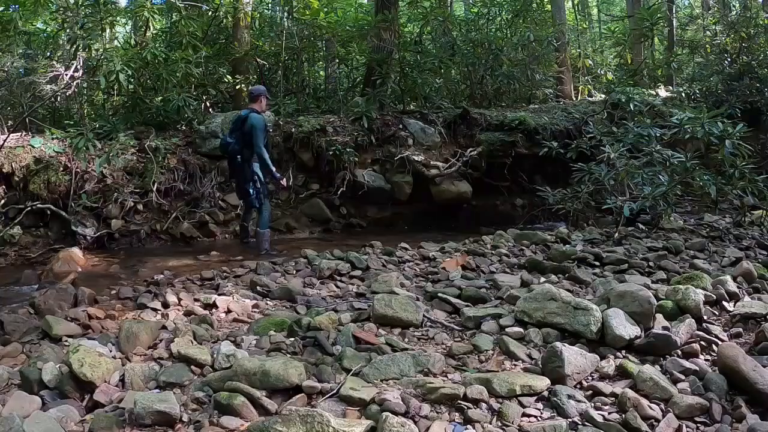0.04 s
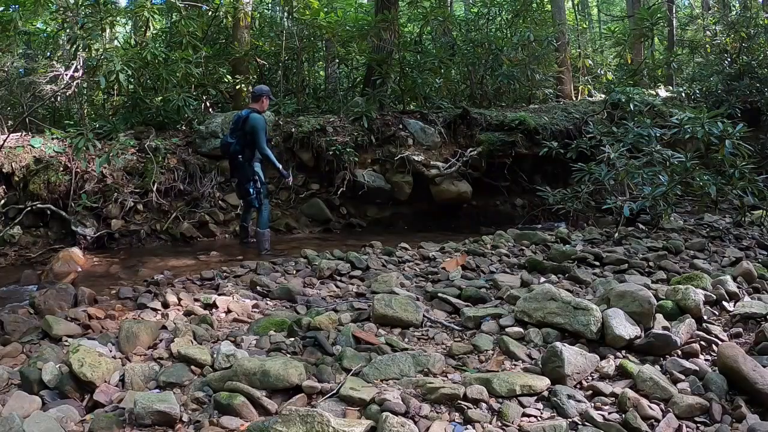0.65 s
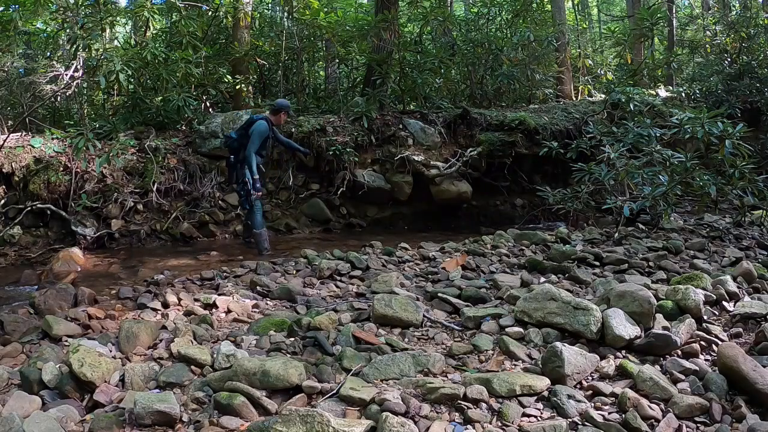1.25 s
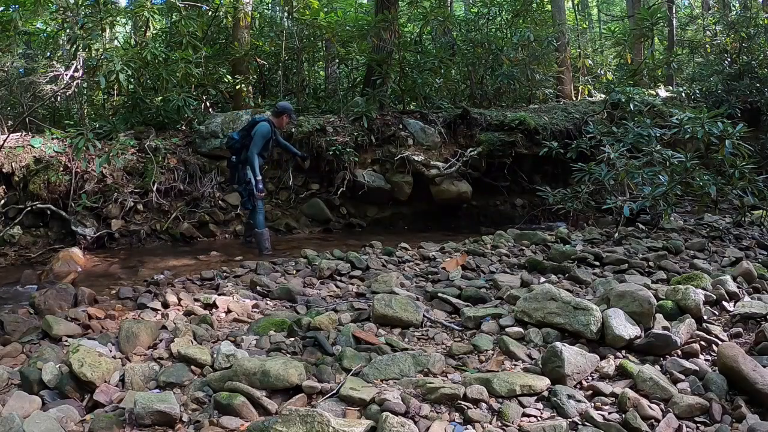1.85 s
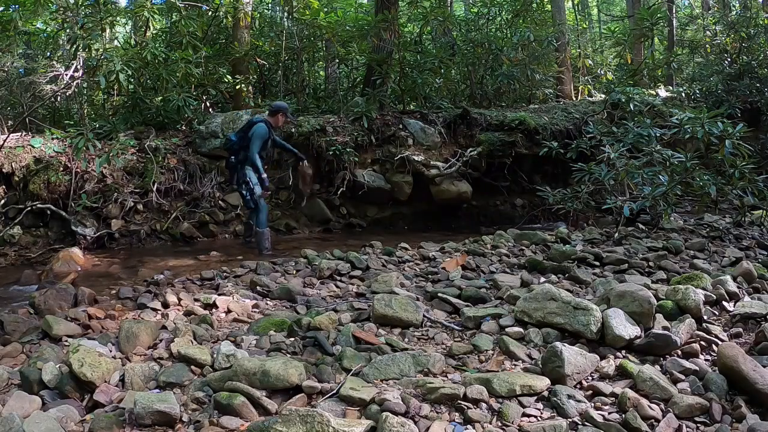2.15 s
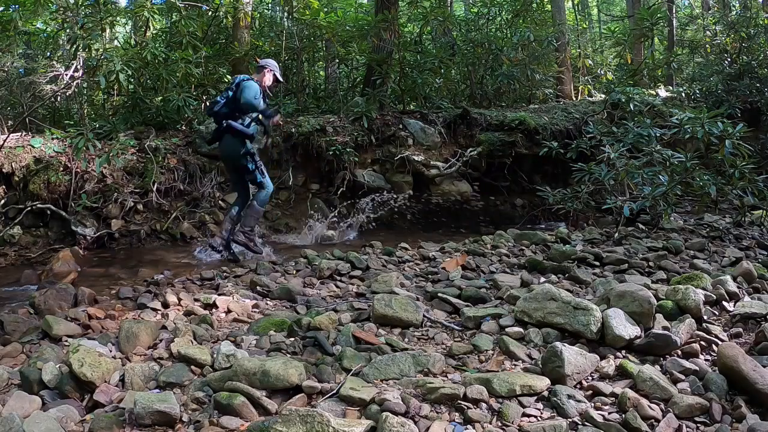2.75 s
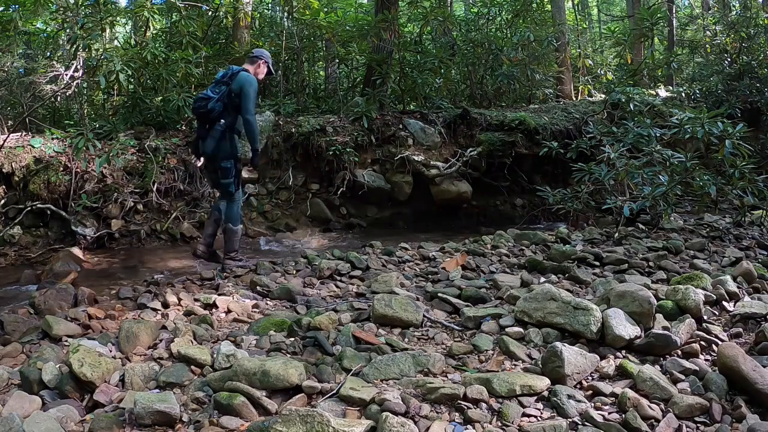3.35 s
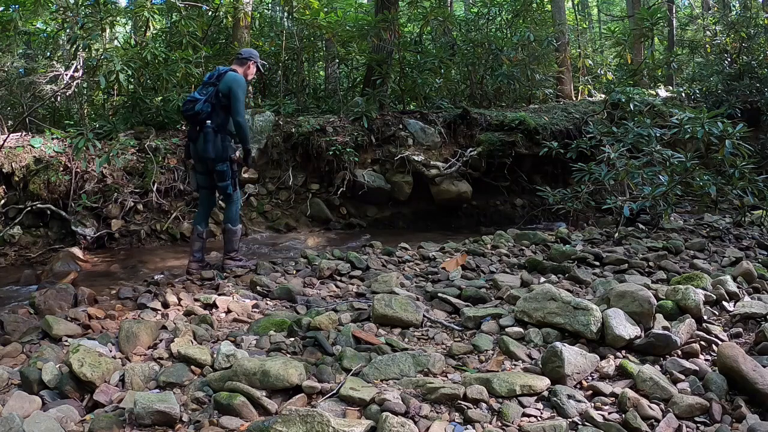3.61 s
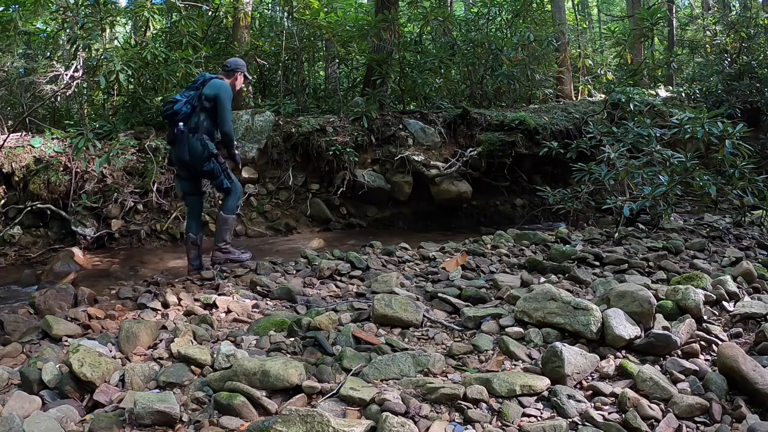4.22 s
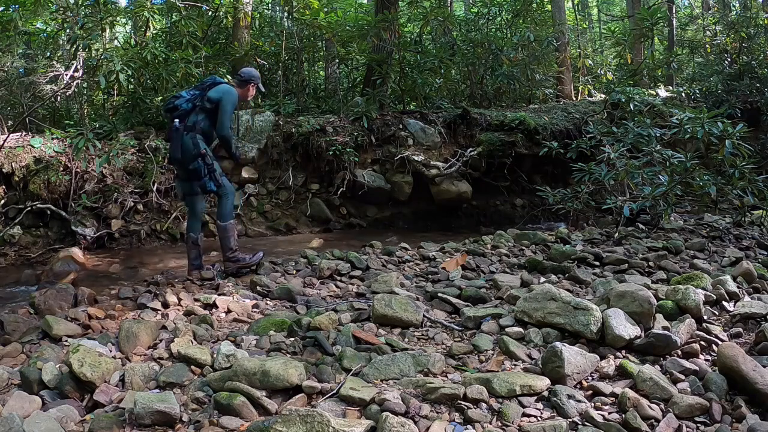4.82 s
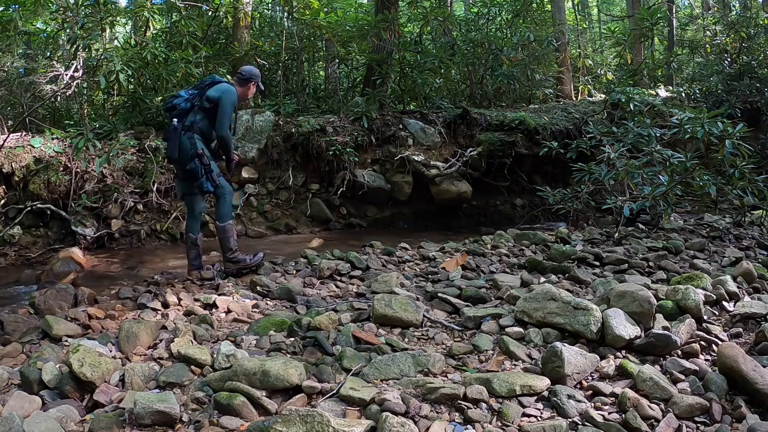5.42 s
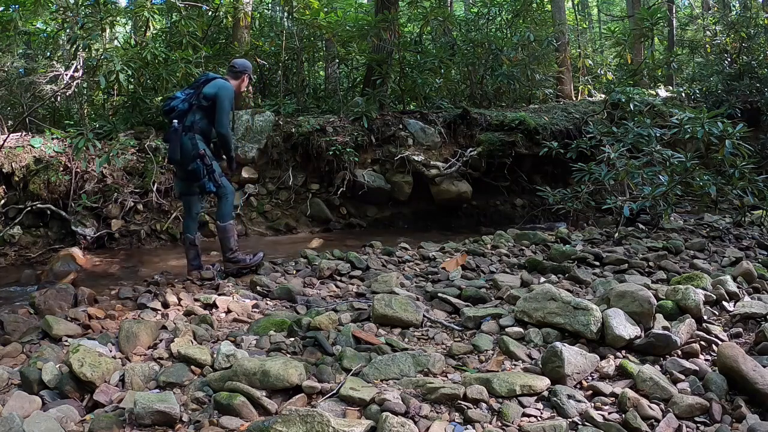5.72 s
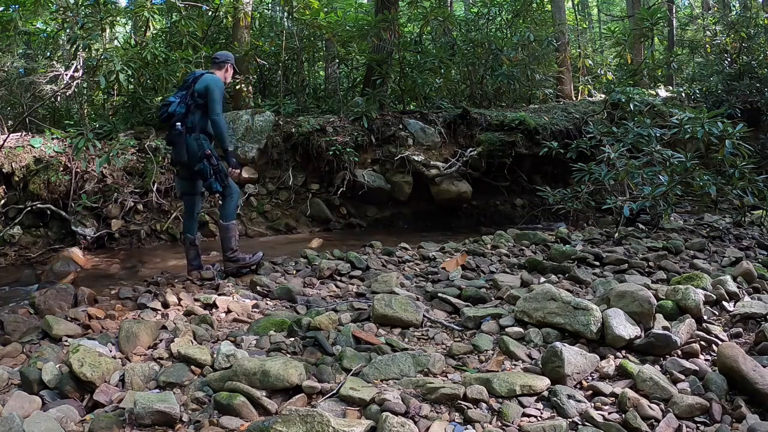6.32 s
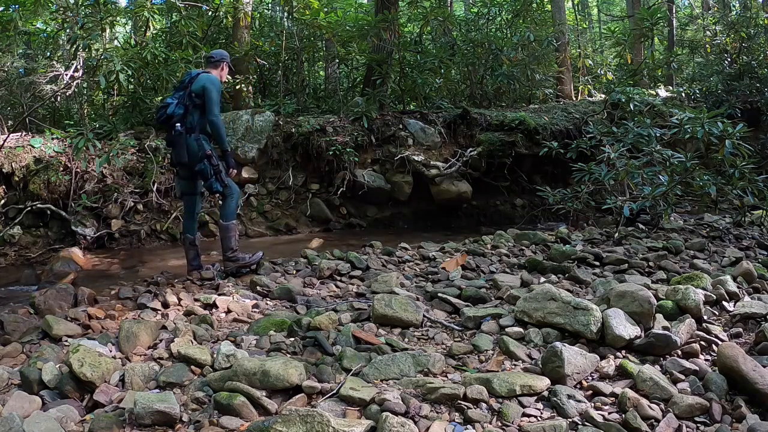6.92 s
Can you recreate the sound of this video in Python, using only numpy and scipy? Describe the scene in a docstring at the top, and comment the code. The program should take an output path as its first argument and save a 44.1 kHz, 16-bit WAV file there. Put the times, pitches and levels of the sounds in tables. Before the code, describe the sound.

Running water babbles softly over stones in a forest. A brief spill of earth and clicking pebbles leads into a loud double splash straight ahead, as a stone drops into the creek with a hollow gulp. Droplets patter back and bubbles glug while a hiker takes a few sloshing steps, wet soles rasping lightly over gravel. Then only the stream and a faint, high insect chorus remain, heard from a short distance in the open air.

```python
"""A stone plunges from a creek bank into a pool: the water slaps and the air cavity resonates.
Soil rustles and pebbles click just before it; afterwards spray rains back, trapping bubbles that ring
as damped oscillators, and a hiker's boots slosh, thud and scuff through the shallows.
Throughout, the creek hisses and gurgles with swarms of bubbles, and far insects sing in the forest."""
import sys
import numpy as np
from scipy import signal
from scipy.fft import rfft, irfft
from scipy.io import wavfile
from scipy.ndimage import uniform_filter1d

SR = 44100
rng = np.random.default_rng(int(sys.argv[2]) if len(sys.argv) > 2 else 0)


def store_wav(level_fs):
    """Save 16-bit WAV to argv[1]."""
    pcm = np.round(np.clip(np.atleast_2d(level_fs), -1, 1) * 32767)
    wavfile.write(sys.argv[1], SR, pcm.T.astype(np.int16))


N = 315756
TIME, HZ = np.arange(N) / SR, np.fft.rfftfreq(N, 1 / SR)


# pebbles striking the water ahead of the stone: start_s, level_db, pitch_hz
PEBBLE_TICKS = [(2.4184, -6, 3350), (2.427, -7.5, 3850)]
# heavy entries into the pool: start_s, level_db, pitch_factor, t60_factor
STONE_PLUNGES = [(2.4313, -5.5, 0.95, 0.4), (2.438, -11, 0.88, 0.41), (2.6521, 4.5, 0.938, 0.9)]
# resonances of the hollow that a plunge opens: base_pitch_hz, relative_db, base_t60_s
HOLLOW_MODES = [(156, -1, 0.026), (249, -1.5, 0.052), (507, 1, 0.045), (680, -4.5, 0.038)]

def plunges():
    """Impulse excitation: pebbles tick on the surface, then each plunge rings the modes of its hollow."""
    out, t = np.zeros(N), np.arange(SR // 4) / SR
    for s, db, hz in PEBBLE_TICKS:
        add(out, s, amp(db) * ring(t, hz, t60=.0022, swell_s=.00026, rise_oct=0))
    for s, db, pitch_factor, t60_factor in STONE_PLUNGES:
        for hz, mode_db, t60 in HOLLOW_MODES:
            mode = ring(t, hz * pitch_factor, t60 * t60_factor, swell_s=.002, rise_oct=.06)
            add(out, s, amp(db + mode_db) * mode)
    return signal.sosfilt(butterworth(2, 105, "high"), out)


def cavity(start_s=2.656, rise_s=.0094, pitch_hz=371.6, waver_hz=7, drop_hz=30, drop_s=.014):
    """Cavity resonance: air trapped by the last plunge sings until the water closes over it."""
    onset = envelope(start_s, -7.5, rise_s, hold_s=0, fall_db_per_s=750)
    held = envelope(start_s, -11, rise_s, hold_s=.069, fall_db_per_s=1400)
    waver = waver_hz * drift(smooth_s=.0076)
    sharp = drop_hz * np.exp(-np.maximum(TIME - start_s, 0) / drop_s)  # sinks as the cavity stretches
    turns = np.cumsum((pitch_hz + sharp + waver) * (TIME > start_s)) / SR
    return (onset + held) * np.sin(2 * np.pi * turns)


# blows on the water: start_s, level_db, centre_hz, t60_s
WATER_SLAPS = [(.042, -37, 700, .05), (2.433, -15.5, 1860, 0.04), (2.4828, -10, 3000, 0.023),
               (2.4825, -20.5, 700, .04), (2.483, -30, 8000, 0.05), (2.49, -31, 1810, .12),
               (2.509, -32, 2800, 0.05), (2.5475, -21, 2300, 0.028), (2.5488, -23.5, 5600, 0.016),
               (2.6005, -22.5, 1700, 0.012), (2.6396, -27, 2210, 0.2), (2.7274, -26, 1800, .04),
               (2.7818, -23.5, 2000, 0.05), (2.888, -30.5, 5600, 0.15), (2.938, -33, 3200, 0.063),
               (3.1669, -21, 1620, 0.025), (3.178, -29, 2000, 0.037), (3.3794, -32.5, 2300, 0.036),
               (3.408, -28, 1500, 0.028), (3.4355, -25.5, 2100, 0.014), (4.563, -38, 1200, .04),
               (4.701, -37, 850, .04)]

def slaps():
    """Impact noise: a brief blow on the water radiates over a wide band."""
    return impacts(WATER_SLAPS, octaves=1.73, swell_s=.00028, top_hz=7600)


# throws of water: start_s, spray_db, slosh_db, fall_db_per_s
THROWS = [(2.481, -22.5, -21, 127), (2.584, -39, -25, 200), (2.649, -38, -25, 80), (2.712, -28.5, -28, 66),
          (2.778, -29.5, -32, 99), (2.888, -34.5, -38, 19), (3.09, -37.5, -50, 39), (3.148, -55, -37, 117),
          (3.37, -47, -39, 110), (3.53, -57.5, -44.5, 72)]
# swells of the pool after the plunges and as water falls back: start_s, level_db, hold_s
POOL_HEAVES = [(2.48, -42.5, 0.13), (2.645, -37, .05), (2.905, -46.5, 0.098)]
# spectra of the spray, the slosh and the heaving pool: frequency_hz, density_db
SPRAY_SPECTRUM = [(100, -22), (300, -16), (900, -2), (1600, -1.5), (3300, -2), (5000, -6.5), (7500, -12.5),
                  (9000, -16.5), (10800, -23.5), (12600, -26), (15000, -39)]
SLOSH_SPECTRUM = [(30, -26), (90, -17), (180, -1), (400, 0), (700, -4), (1300, -7), (2500, -11),
                  (8000, -46), (15000, -80)]
HEAVE_SPECTRUM = [(20, -18), (40, -1), (90, -8), (150, -6), (300, -25), (1500, -55), (15000, -95)]

def splash(end_s=4.1, rise_s=.0029, clump_db=1.4):
    """Incoherent summation: drops rain back, larger bubbles churn below, and the whole pool heaves."""
    span = start_s, end_s = THROWS[0][0], end_s
    duty_gain = np.sqrt((end_s - start_s) * SR / N)  # the swarms sound for only part of the time
    drops = swarm(per_s=6000, band_hz=(504, 13480), cycles=36, spread_db=1.5, rise_oct=.16, span_s=span)
    patter = swarm(per_s=320, band_hz=(2500, 14000), cycles=6.4, spread_db=8, rise_oct=0, span_s=span)
    plips = swarm(per_s=420, band_hz=(894, 5510), cycles=81, spread_db=2.5, rise_oct=.14, span_s=span)
    churn = swarm(per_s=900, band_hz=(131.4, 2200), cycles=17.4, spread_db=3, rise_oct=.53, span_s=span)
    mist, foam, heave = rng.standard_normal((3, 2, N))
    rain = colour(drops + amp(-17) * patter + amp(-6) * plips, SPRAY_SPECTRUM)
    spray = amp(-5) * duty_gain * rain + amp(-4) * colour(mist, SPRAY_SPECTRUM)
    slosh = amp(-2) * duty_gain * colour(churn, SLOSH_SPECTRUM) + amp(-5) * colour(foam, SLOSH_SPECTRUM)
    thrown = np.sqrt(sum(envelope(s, db, rise_s, 0, fall) ** 2 for s, db, _, fall in THROWS))
    stirred = np.sqrt(sum(envelope(s, db, rise_s, 0, fall) ** 2 for s, _, db, fall in THROWS))
    clumps = unit_rms(amp(clump_db * np.clip(drift(smooth_s=.009), -2, 2)))  # water falls in gobs
    heaving = surges(POOL_HEAVES, rise_s=.025, fall_db_per_s=210) * colour(heave, HEAVE_SPECTRUM)
    return thrown * clumps * spray + stirred * slosh + heaving


# the loudest single air pockets: start_s, level_db, pitch_hz, t60_factor, rise_oct
AIR_POCKETS = [(.04, -36, 410, .7, .1), (0.053, -38, 255, 1.1, -0.29), (.094, -37, 420, .7, .1),
               (.22, -42, 335, 1, .2), (0.289, -31.5, 543, 0.49, 0.099), (.408, -38, 440, .8, 0.45),
               (.483, -42, 304, 1.5, .1), (.553, -31.5, 442, 0.81, -0.089), (.615, -41, 340, 1.1, 0.49),
               (.666, -39, 560, .9, -0.12), (.838, -35, 302, 1.3, 0.39), (.93, -39, 380, 1.4, -.2),
               (.957, -38, 326, 1.4, -0.027), (.983, -32.5, 740, 0.89, -0.2), (.985, -33, 386, 0.87, 0.26),
               (1.04, -43, 306, 1.4, 0.18), (1.146, -40, 400, 1, .2), (1.331, -41, 525, 1, .1),
               (1.653, -42, 425, 1, .1), (2.023, -34.5, 702, 1.2, 0.27), (2.433, -12, 398, 0.48, 0.2),
               (2.434, -13, 697, 0.38, -0.087), (2.447, -27, 980, .7, 0.043), (2.451, -20, 200, .8, .15),
               (2.486, -17.5, 665, 1, 0.061), (2.486, -17, 803, 1.1, 0.1), (2.503, -21, 286, 0.87, 0.037),
               (2.533, -29, 483, 1, -0.13), (2.588, -25, 590, 0.91, .1), (2.591, -22, 1342, 1.1, -0.28),
               (2.612, -14.5, 375, 0.64, 0.88), (2.672, -14, 205, 1, -0.24), (2.658, -20, 850, .9, -.1),
               (2.708, -24, 180, 1, 0.018), (2.726, -29, 1010, .8, .1), (2.769, -17, 466, 0.9, .3),
               (2.779, -16.5, 620, 0.69, 0.43), (2.7912, -9, 295, 0.74, 0.094), (2.81, -25, 422, .8, .2),
               (2.823, -25, 395, 0.65, 0.76), (2.843, -33, 390, 1, .3), (3.018, -29, 997, 0.87, -0.084),
               (3.114, -30, 325, 1.53, -0.025), (3.145, -31, 475, 0.89, 0.67),
               (3.154, -19.5, 678, 0.33, -0.1), (3.159, -26, 391, 1.2, 0.69), (3.19, -32, 179, 1.9, -0.12),
               (3.338, -30.5, 441, 3.1, -0.25), (3.373, -23, 597, 0.66, 0.22), (3.378, -17, 496, 0.89, .1),
               (3.461, -22, 425, 0.71, 0.061), (3.463, -32, 848, 1.2, 0.45),
               (3.537, -34.5, 291, 1.3, -0.15), (3.573, -37, 527, 0.98, 0.51), (3.602, -36, 484, 1.3, 0.95),
               (3.6, -38, 1200, 1.3, .1), (3.672, -33, 2870, .8, -0.2), (3.709, -38, 1300, 1.1, -0.045),
               (3.734, -34.5, 510, 2.2, -0.34), (3.781, -33, 2540, .7, -0.061), (3.873, -38, 320, 0.82, .2),
               (3.941, -37, 428, 0.88, 0.33), (4.012, -36, 514, 1.4, 0.36),
               (4.014, -36.5, 430, 0.93, -0.076), (4.122, -39.5, 485, 1.6, 1.3),
               (4.187, -37.5, 406, 1, 0.36), (4.361, -32.5, 352, 0.69, 0.28), (4.432, -34, 960, 0.87, 0.25),
               (4.551, -38, 427, .6, 0.053), (4.654, -39, 437, .7, .1), (4.826, -37, 640, .7, .1),
               (4.833, -35, 445, 1.5, -0.025), (4.908, -39, 327, 1.5, 0.12), (5.008, -39, 350, 1.3, 0.48),
               (5.042, -34, 438, 0.76, 0.16), (5.115, -39.5, 312, 1.6, -0.083),
               (5.183, -39, 621, 4.1, 1.04), (5.281, -32, 490, 0.5, -0.015), (5.397, -38, 703, 1, -0.14),
               (5.426, -40, 690, 1.5, .1), (5.47, -38.5, 450, 1.4, 0.36), (5.495, -38, 547, 1.35, 0.76),
               (5.566, -36.5, 1038, 2, 0.66), (5.643, -40, 405, 1, -0.42), (5.83, -41, 754, 2.3, 0.042),
               (5.897, -37, 560, 1, 0.27), (6.093, -33.5, 550, 0.6, 0.044), (6.182, -35.5, 670, 0.68, 0.27),
               (6.257, -39, 322, 1.2, 0.1), (6.31, -44, 500, 1.6, 0.33), (6.36, -41.5, 328, 1.6, .2),
               (6.413, -38, 535, 1.2, -0.38), (6.429, -37, 773, 0.81, 0.25), (6.438, -42, 425, 0.89, 0.088),
               (6.587, -40, 946, 1.1, 0.36), (6.926, -35, 1310, 1.1, 0.49), (6.942, -38, 594, 1.3, -0.57),
               (6.98, -40, 409, 2.4, 0.33), (7.018, -38, 530, 1.2, 0.057), (7.08, -44, 400, 1.1, 0.048)]

def pockets():
    """Bubble resonance: single air pockets glug in the creek, in the pool and round the boots."""
    out = np.zeros(N)
    for s, db, hz, t60_factor, rise_oct in AIR_POCKETS:
        add(out, s, amp(db) * pocket(hz, t60_factor, rise_oct))
    return out


def pocket(hz, t60_factor, rise_oct, swell_s=.0038, slop_db=-12):
    """Size scaling: a smaller pocket rings higher and dies sooner; water slops round it as it forms."""
    t = np.arange(SR // 4) / SR
    t60 = t60_factor * .067 * (400 / hz) ** .27
    band = butterworth(4, band_edges(hz, octaves=1.53), "band")
    slop = unit_rms(signal.sosfilt(band, rng.standard_normal(len(t))))
    slop *= np.minimum(t / swell_s, 1) * decay(t, t60=.1)
    return ring(t, hz, t60, swell_s, rise_oct) + amp(slop_db) * slop


# small bright drips: start_s, level_db, pitch_hz
SINGLE_DRIPS = [(.032, -36, 1325), (.614, -39, 2225), (.659, -42, 2975), (1.054, -36, 2390),
                (1.618, -38, 1346), (2.333, -29, 2510), (2.484, -23, 1990), (2.492, -28, 1347),
                (2.506, -24, 2550), (2.511, -27, 3350), (2.545, -29, 2850), (2.786, -30, 2000),
                (2.791, -28, 2380), (2.848, -31, 3200), (2.894, -30, 4100), (2.939, -33, 3600),
                (2.999, -34, 1550), (3.177, -29, 2475), (3.255, -34, 1630), (3.435, -33, 2550),
                (3.568, -37, 3075), (3.674, -41, 3160), (4.617, -39, 1350), (4.695, -42, 4160),
                (4.972, -39, 1350), (5.603, -38, 1370), (5.76, -37, 1390), (6.133, -41, 1460),
                (6.278, -39, 2150), (6.619, -38.5, 1620), (6.795, -37, 1950), (6.859, -41, 1950),
                (7.051, -39, 1275)]

def drips():
    """Air entrainment: each drop traps a tiny bubble that rings with a clear plip."""
    out, t = np.zeros(N), np.arange(SR // 8) / SR
    for s, db, hz in SINGLE_DRIPS:
        add(out, s, amp(db) * ring(t, hz, t60=.057, swell_s=.0023, rise_oct=.11))
    return out


# showers of the finest droplets: start_s, level_db, hold_s
SHOWERS = [(2.485, -46, 0.018), (2.89, -49, .015), (2.978, -51, .03), (3.04, -62, .25)]
# spectrum of their impacts: frequency_hz, density_db
SHOWER_SPECTRUM = [(1000, -30), (4000, -6), (7000, -8), (9000, 1), (11000, -10), (13000, -7), (15000, -16)]

def sprinkle():
    """Shot noise: fine droplets land at random as bright, separate ticks."""
    ticks = swarm(per_s=900, band_hz=(5000, 14500), cycles=12, spread_db=2, rise_oct=0)
    return surges(SHOWERS, rise_s=.008, fall_db_per_s=200) * colour(ticks, SHOWER_SPECTRUM)


# stone knocks and crackling grit: start_s, level_db, centre_hz, t60_s
STONE_KNOCKS = [(.035, -37, 1700, 0.047), (.1922, -29, 1640, 0.034), (1.9872, -25.5, 2900, 0.019),
                (1.9872, -31, 1300, .014), (2.02, -37, 940, 0.15), (2.2652, -27.5, 1440, 0.043),
                (2.2652, -26, 330, 0.05), (2.3083, -19, 6600, 0.016), (2.3083, -25, 2740, .04),
                (2.3186, -25, 6940, 0.04), (2.3186, -25, 2760, 0.077), (2.3335, -26, 1940, 0.018),
                (2.339, -26, 8500, 0.01), (2.852, -26, 8000, 0.011), (3.532, -35.5, 7550, 0.02),
                (3.672, -37.5, 2793, .06), (3.782, -37, 2600, .04), (4.434, -38, 1000, .04),
                (4.466, -38, 3900, .02), (4.692, -42, 4100, .06)]

def knocks():
    """Hard contact: stone and grit give noise bursts with an abrupt onset."""
    return impacts(STONE_KNOCKS, octaves=.93, swell_s=.0001, top_hz=11300)


# pebble collisions: start_s, level_db, pitch_hz
COLLISIONS = [(2.298, -24, 4900), (2.3038, -17, 4660), (2.3082, -19, 3000), (2.3188, -18, 3820),
              (2.334, -19.5, 1310), (2.3392, -27, 4900), (2.64, -21.5, 3020), (3.436, -30, 2600),
              (4.548, -30, 2880)]
# resonances of a pebble: pitch_ratio, relative_db, t60_s
CLICK_MODES = [(1, 2, .006), (1.35, -1, .004), (1.88, -4.5, .008)]

def clicks():
    """Modal vibration: colliding pebbles ring very briefly at inharmonic frequencies."""
    out, t = np.zeros(N), np.arange(SR // 20) / SR
    for s, db, hz in COLLISIONS:
        for ratio, mode_db, t60 in CLICK_MODES:
            add(out, s, amp(db + mode_db) * ring(t, hz * ratio, t60, swell_s=.00014, rise_oct=0))
    return out


# two spills of soil down the bank: start_s, level_db, hold_s
SOIL_SPILLS = [(2.292, -36, 0.044), (2.403, -33.5, 0.052)]
# spectrum of sliding soil: frequency_hz, density_db
SOIL_SPECTRUM = [(60, -27), (300, -2), (1500, -3), (3300, -4.5), (5500, -11), (9000, -16), (12000, -29),
                 (15000, -46)]

def soil():
    """Granular flow: crumbs of earth rustle down in a grainy hiss."""
    rustle = colour(grainy_noise(grain_db=3, grain_samples=20), SOIL_SPECTRUM)
    return surges(SOIL_SPILLS, rise_s=.0056, fall_db_per_s=130) * rustle


# boots landing on the creek bed: start_s, level_db, pitch_hz, t60_s
FOOTFALLS = [(1.998, -47, 100, .06), (2.914, -22.5, 119, 0.023), (2.959, -17.5, 151, 0.024),
             (3.015, -29.5, 188, 0.074), (3.068, -35, 144, 0.044), (3.586, -32.5, 156, 0.053),
             (4.558, -36.5, 155, 0.099), (4.695, -41, 170, 0.07)]

def boots(swell_s=.0036, crunch_db=-13, crunch_hz=(130, 900)):
    """Heavy damping: a boot's low thud lasts a few cycles, and the gravel shifts under it."""
    out, t = np.zeros(N), np.arange(SR // 6) / SR
    muffle = butterworth(2, crunch_hz, "band")
    for s, db, hz, t60 in FOOTFALLS:
        thud = ring(t, hz, t60, swell_s, rise_oct=-.14)
        gravel = unit_rms(signal.sosfilt(muffle, rng.standard_normal(len(t))))
        crunch = gravel * np.minimum(t / swell_s, 1) * decay(t, 2 * t60)
        add(out, s, amp(db) * (thud + amp(crunch_db) * crunch))
    return signal.sosfilt(butterworth(2, 65, "high"), out)


# the hiker's shifts of weight: start_s, level_db, hold_s
WEIGHT_SHIFTS = [(0, -41.5, 0.015), (1.87, -50, 0.29), (2.28, -44.5, 0.043)]
# spectrum of water washing round the boots: frequency_hz, density_db
SWIRL_SPECTRUM = [(30, -28), (100, -37), (150, 2.5), (260, 3), (420, -10), (1300, -3.5), (3000, -17),
                  (9000, -24), (15000, -54)]

def wading():
    """Flow noise: a shift of weight pushes a soft, low swirl round the boots."""
    swirl = colour(rng.standard_normal((2, N)), SWIRL_SPECTRUM)
    return surges(WEIGHT_SHIFTS, rise_s=.019, fall_db_per_s=164) * swirl


# drags of a wet boot over the stones: start_s, level_db, hold_s
SOLE_DRAGS = [(3.558, -48, 0.0091), (3.66, -42, 0.013), (3.698, -48, 0.037), (3.772, -44, .014),
              (4.115, -53, 0.025), (4.265, -52, 0.022), (4.41, -48.5, 0.047), (4.475, -49, .012),
              (4.525, -48, 0.017)]
# spectrum of rubber on wet gravel: frequency_hz, density_db
SCUFF_SPECTRUM = [(100, -35), (600, -8), (1200, -3), (1900, -10), (2700, -6), (3400, -3.5), (4200, -1),
                  (6000, -19), (9000, -14), (15000, -35)]

def scuffs(drip_db=-4):
    """Sliding friction: soles rasp over wet gravel in short swishes, with little drips among them."""
    rasp = unit_rms(grainy_noise(grain_db=2, grain_samples=60))
    droplets = swarm(per_s=450, band_hz=(1010, 3280), cycles=80, spread_db=2.5, rise_oct=.1)
    swish = colour(rasp + amp(drip_db) * droplets, SCUFF_SPECTRUM)
    return surges(SOLE_DRAGS, rise_s=.0098, fall_db_per_s=450) * swish


# spectra of running water and of gurgling between the stones: frequency_hz, density_db
WASH_SPECTRUM = [(20, -27), (80, -21.5), (110, -39), (140, -9), (200, -6.5), (420, -2), (900, -5),
                 (1500, -3), (4300, -6), (6500, -6.5), (7700, -12.5), (8150, -19.5), (9000, -18.5),
                 (10800, -31), (13000, -37), (15000, -71)]
GURGLE_SPECTRUM = [(100, -32), (170, -14), (260, -4.5), (400, 1.5), (620, 3), (1000, -5), (1600, -3.5),
                   (2800, -9.5), (6000, -34.5)]
# left-right likeness of the creek: frequency_hz, coherence
CREEK_COHERENCE = [(100, 0.52), (400, 0.87), (1300, 0.89), (3000, 0.71), (5500, 0.32), (10000, 0.054)]
# its lean to the left: frequency_hz, left_minus_right_db
CREEK_BALANCE = [(60, 0.5), (110, -2), (200, 1), (380, 0.5), (700, 3), (1290, 2), (2380, 5), (4400, 4.5),
                 (8120, 3.5), (15000, -4)]

def creek(wash_db=-42.5, gurgle_db=-53, glug_db=-54, runs_db=-52, trickle_db=-57):
    """Superposed bubble resonances: fine bubbles fizz in the hiss, larger ones gurgle between stones."""
    hiss = riffle_hiss()
    fizz = swarm(per_s=1200, band_hz=(608, 8950), cycles=49, spread_db=2.5, rise_oct=.049)
    wash = amp(wash_db) * colour(amp(2) * hiss + amp(-9) * fizz, WASH_SPECTRUM)
    gurgles = swarm(per_s=520, band_hz=(235.3, 2824), cycles=31, spread_db=3, rise_oct=.33)
    glugs = swarm(per_s=90, band_hz=(270.6, 1100), cycles=98.4, spread_db=1.2, rise_oct=.61)
    babble = amp(gurgle_db) * eddies() * colour(gurgles, GURGLE_SPECTRUM)
    babble += amp(glug_db) * colour(glugs, GURGLE_SPECTRUM)
    trickle = swarm(per_s=70, band_hz=(996, 3500), cycles=140, spread_db=2.5, rise_oct=.14)
    babble[0] += amp(runs_db) * glug_runs() + amp(trickle_db) * trickle[0]
    return stereo(wash + babble, CREEK_COHERENCE, CREEK_BALANCE, left_lag_s=1.4e-5)


def riffle_hiss(patchy_db=1.43):
    """Modulated noise: the riffle's hiss flickers in patches of time and frequency."""
    real, imag, patches = rng.standard_normal((N // 256 + 5, 513, 2, 3)).T
    patches = uniform_filter1d(patches[0], size=14, axis=0)  # across frequency
    patches = unit_rms(uniform_filter1d(patches, size=8, axis=1))  # across time
    spectrogram = (real + 1j * imag) * amp(patchy_db * patches)
    return unit_rms(signal.istft(spectrogram, nperseg=1024, noverlap=768)[1][:, :N])


def eddies(swell_db=2.5, swell_s=.21):
    """Slow amplitude modulation: the gurgles follow the flow as it gathers and slackens."""
    flow = rng.standard_normal(N)
    for _ in range(2):
        flow = uniform_filter1d(flow, int(swell_s * SR), mode="wrap")
    return amp(swell_db * np.clip(unit_rms(flow), -2, 2))


def glug_runs(runs_per_s=5, count=7, gap_s=.022, centre_hz=430, spread_db=2.5):
    """Bubble trains: air escapes between the stones in short runs of like size, hence like pitch."""
    out = np.zeros(N)
    for slot_s in np.arange(0, N / SR, 1 / runs_per_s):
        draws = rng.uniform(-1, 1, (count + 1, 3))
        late, run_pitch, _ = draws[0]
        s = slot_s + (1 + late) / 2 / runs_per_s
        for wait, detune, force in draws[1:]:
            hz = centre_hz * 2 ** (.595 * run_pitch + .25 * detune)
            add(out, s, amp(spread_db * force) * pocket(hz, t60_factor=.7, rise_oct=.14))
            s += gap_s * (1 + wait / 2)
    return out


# peaks of the insects' song: centre_hz, half_width_hz, level_db
SONG_PEAKS = [(3140, 130, -3), (3980, 250, 2), (5300, 410, -6), (6100, 650, -4.5)]
# swell of the chorus: time_s, level_db
CHORUS_SWELL = [(0, -60), (0.6, -53), (2, -49.5), (3.9, -66), (4.8, -52), (5.5, -48.5), (6.3, -46.5),
                (7.2, -47.5)]

def insects(lean_db=1):
    """Spectral broadening: the notes of many far callers blur into narrow bands of hiss."""
    song = sum(amp(db) / (1 + ((HZ - hz) / width) ** 2) for hz, width, db in SONG_PEAKS)
    chorus = unit_rms(irfft(rfft(rng.standard_normal((2, N))) * song, N))
    swell = amp(np.interp(TIME, *np.transpose(CHORUS_SWELL)))
    return chorus * swell * amp([[lean_db], [-lean_db]])


# reverberation time of the forest: frequency_hz, t60_s
FOREST_DECAY = [(150, 0.6), (1000, 0.32), (4000, 0.31), (12000, 0.12)]

def forest(x, echoes_per_s=2000):
    """Scattering: echoes return from the bank, stones and trunks, and the treble dies first."""
    taps = rng.standard_normal((2, SR // 2)) * (rng.random((2, SR // 2)) < echoes_per_s / SR)
    taps[:, :SR // 200] = 0  # the first echo takes 5 ms
    hz, t, spectrogram = signal.stft(taps, SR, nperseg=256)
    tail = signal.istft(spectrogram * decay(t, curve(FOREST_DECAY, hz)[:, None]), SR, nperseg=256)[1]
    return signal.fftconvolve(x[None], tail / np.linalg.norm(tail[0]), axes=1)[:, :N]


def ring(t, hz, t60, swell_s, rise_oct):
    """Damped oscillator: its pitch glides by about rise_oct per t60, as a surfacing bubble's climbs."""
    turns = hz * t * (1 + np.log(2) * rise_oct * t / t60 / 2)
    onset = 1 - np.exp(-(t / swell_s) ** 2)
    return np.sin(2 * np.pi * turns) * onset * decay(t - swell_s, t60)


def swarm(per_s, band_hz, cycles, spread_db, rise_oct, span_s=(0, N / SR)):
    """Random superposition: two independent swarms of ringing bubbles, with equal power per Hz."""
    (start, end), (low, high) = span_s, np.sqrt(band_hz)
    when, pitch, force, side = rng.random((int(per_s * (end - start)), 4)).T
    hz = (low + pitch * (high - low)) ** 2
    gain = hz ** .75 * amp(spread_db * np.minimum(-np.log(1 - force), 4))
    length = (cycles * SR / hz).astype(int) + 1
    k = np.repeat(np.arange(len(hz)), length)  # the bubble that each sample belongs to
    age = np.arange(len(k)) - (np.cumsum(length) - length)[k]
    sound = gain[k] * ring(age / SR, hz[k], cycles / hz[k], .5 / hz[k], rise_oct)
    at = ((start + when * (end - start)) * SR).astype(int)[k] + age
    return unit_rms(np.array([np.bincount(at, sound * half[k], N)[:N] for half in (side < .5, side >= .5)]))


def impacts(rows, octaves, swell_s, top_hz, bounce_s=.00148, bounce_db=-14):
    """Band-limited transients: each blow is a dying shower of tiny contacts, dulled by distance."""
    out, t = np.zeros((2, N)), np.arange(SR // 4) / SR
    dull = butterworth(2, top_hz, "low")
    for s, db, hz, t60 in rows:
        fade = (1 - np.exp(-t / swell_s)) * decay(t, t60)
        band = butterworth(2, band_edges(hz, octaves), "band")
        burst = signal.sosfilt(np.vstack([band, dull]), rng.standard_normal((2, len(t))) * fade)
        burst *= np.linalg.norm(fade) / np.linalg.norm(burst, axis=1, keepdims=True)
        add(out, s, amp(db) * burst)
        add(out, s + bounce_s, amp(db + bounce_db) * burst)  # reflection off the flat stones
    return out


def grainy_noise(grain_db, grain_samples):
    """Fast amplitude modulation roughens a pair of noises into grains."""
    noise, size = rng.standard_normal((2, 2, N))
    return noise * amp(grain_db * unit_rms(uniform_filter1d(size[0], grain_samples)))


def drift(smooth_s):
    """A moving average of noise wanders at unit rms."""
    return unit_rms(uniform_filter1d(rng.standard_normal(N), int(smooth_s * SR)))


def envelope(start_s, db, rise_s, hold_s, fall_db_per_s):
    """Linear attack to db, a hold, then exponential decay."""
    age = TIME - start_s
    fallen_db = np.minimum(fall_db_per_s * np.maximum(age - rise_s - hold_s, 0), 200)
    return np.clip(age / rise_s, 0, 1) * amp(db - fallen_db)


def surges(rows, rise_s, fall_db_per_s):
    """Incoherent surges add in power."""
    return np.sqrt(sum(envelope(s, db, rise_s, hold, fall_db_per_s) ** 2 for s, db, hold in rows))


def decay(t, t60):
    """Exponential decay: 60 dB in t60 seconds."""
    return np.exp(-np.log(1000) * t / t60)


def colour(x, spectrum):
    """Spectral shaping, at unit rms."""
    return unit_rms(irfft(rfft(x) * amp(curve(spectrum, HZ)), N))


def curve(points, hz):
    """Interpolation on a log-frequency axis."""
    frequency, value = np.transpose(points)
    return np.interp(np.log(hz + 1), np.log(frequency + 1), value)


def butterworth(order, cutoff_hz, kind):
    """A filter with a maximally flat passband."""
    return signal.butter(order, cutoff_hz, kind, fs=SR, output="sos")


def band_edges(hz, octaves):
    """Edges at equal ratios about hz, capped in the treble."""
    half = 2 ** (octaves / 2)
    return hz / half, min(hz * half, SR / 3)


def amp(db):
    """Decibels to gain."""
    return 10 ** (np.asarray(db) / 20)


def unit_rms(x):
    """Normalisation to an rms of one."""
    return x / np.sqrt(np.mean(x ** 2) + 1e-20)


def add(mix, s, sound):
    """Superposition of a sound at s seconds."""
    part = mix[..., round(s * SR):][..., :sound.shape[-1]]
    part += sound[..., :part.shape[-1]]


def stereo(pair, coherence, balance, left_lag_s):
    """Partial coherence: two independent signals, as mid and side, blend into left and right."""
    mid, side = rfft(pair)
    angle = np.arccos(np.clip(curve(coherence, HZ), 0, 1)) / 2
    mid, side = mid * np.cos(angle), side * np.sin(angle)
    lean = amp(curve(balance, HZ) / 2)
    delay = np.exp(-2j * np.pi * HZ * left_lag_s)
    return irfft(np.array([(mid + side) * lean * delay, (mid - side) / lean]), N)


# left-right likeness of the sounds at the pool: frequency_hz, coherence
POOL_COHERENCE = [(40, .9), (150, .96), (400, .98), (1300, .95), (3000, .9), (6000, .66), (11000, .45)]
# direction of the pool: frequency_hz, left_minus_right_db
POOL_BALANCE = [(40, 2.4), (90, 1.4), (300, 0), (1200, .3), (2800, 1.8), (6000, 1.3), (11000, -.5)]

def scene(echo_db=-20):
    """Localisation by level difference: the pool lies nearly straight ahead, the riffle to the left."""
    pool = knocks() + slaps() + soil() + splash() + sprinkle() + wading() + scuffs()
    pool[0] += plunges() + cavity() + pockets() + drips() + clicks() + boots()  # mid: shared by both sides
    pool += amp(echo_db) * forest(pool[0])
    return stereo(pool, POOL_COHERENCE, POOL_BALANCE, left_lag_s=1.7e-5) + creek() + insects()


def record(dry, threshold_db=-18, squeeze=.47, recovery_db_per_s=55, top_hz=15300):
    """Automatic gain control ducks everything after the loudest blows; a low-pass limits the band."""
    power_db = 10 * np.log10(abs(uniform_filter1d((dry ** 2).mean(0), 200)) + 1e-12)
    release_db = TIME * recovery_db_per_s
    peak_db = np.maximum.accumulate(power_db + release_db) - release_db
    over_db = np.maximum(peak_db - threshold_db, 0)
    ducked = dry / amp(squeeze * uniform_filter1d(over_db, 100))
    low_pass = signal.firwin(511, top_hz, window=("kaiser", 9), fs=SR)
    return signal.oaconvolve(ducked, low_pass[None], "same")


dry = scene()
out = record(dry)
store_wav(out)
```